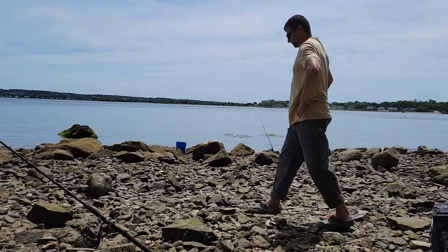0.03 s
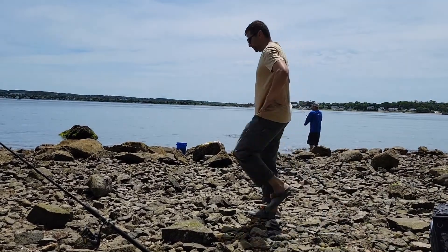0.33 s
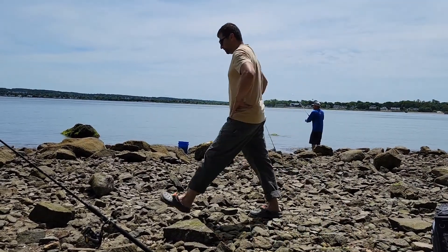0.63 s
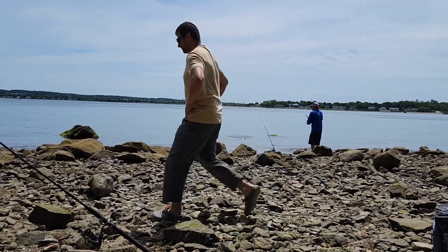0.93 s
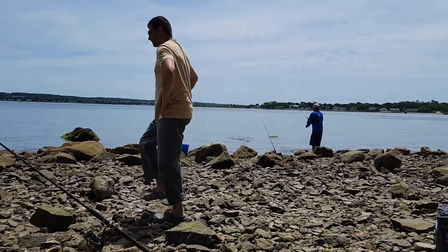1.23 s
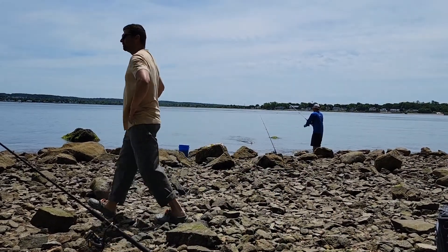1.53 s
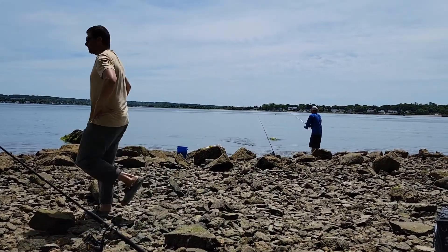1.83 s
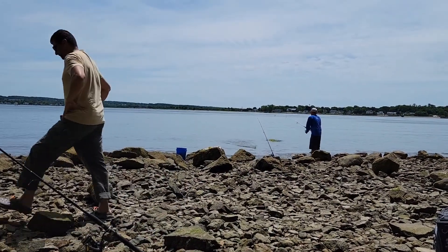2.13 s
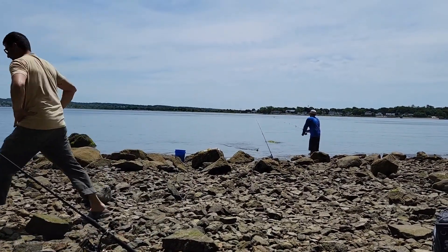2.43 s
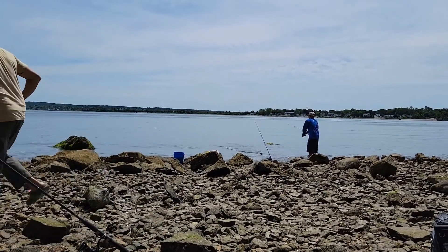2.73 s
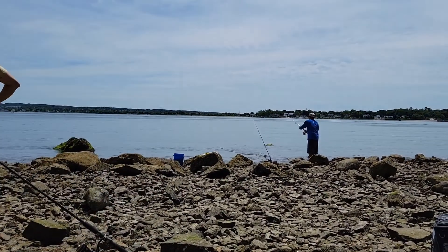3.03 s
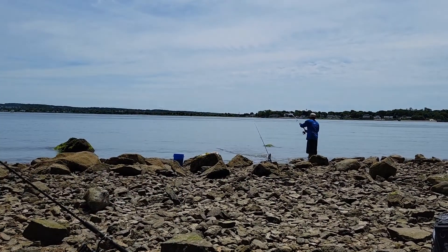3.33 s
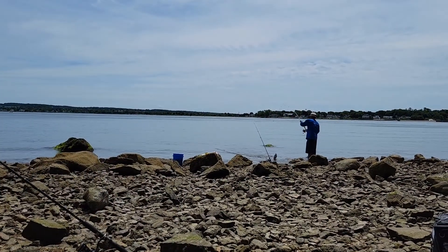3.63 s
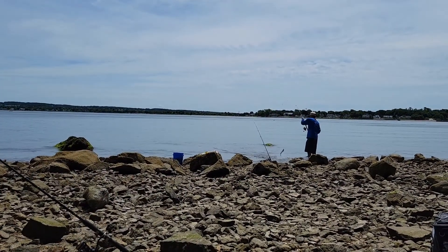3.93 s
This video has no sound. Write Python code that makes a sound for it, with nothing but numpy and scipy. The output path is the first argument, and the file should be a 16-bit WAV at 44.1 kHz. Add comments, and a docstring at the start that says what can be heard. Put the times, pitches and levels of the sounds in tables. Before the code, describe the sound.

Someone walks past on loose shore stones, over soft water and a distant low hum.

```python
"""A stony shore in stereo: someone walks past, close to the microphones, over loose flat stones.
From the start a light breeze brushes the microphones; behind lie a low rumble, a hum like a far boat
engine, a soft wash of water and a bird's thin high whistles. Each footfall rattles stones and crunches
grit; single stones rock and knock, loudest near 1 s, while chips tick and pebbles clink. After 2 s the
steps thin out and the breeze dies away. Just past 3 s the water swells, then a little air returns."""
import sys
import numpy as np
from scipy import signal
from scipy.fft import rfft, irfft, next_fast_len
from scipy.io import wavfile
from scipy.ndimage import uniform_filter1d, map_coordinates

SR = 44100
rng = np.random.default_rng(int(sys.argv[2]) if len(sys.argv) > 2 else 0)


def transcribe(signal):
    """Save signal, clipped to [-1, 1], as a 16-bit WAV file at the path in sys.argv[1]."""
    frames = np.atleast_2d(signal).T
    limited = np.clip(frames, -1, 1)
    pcm = np.round(limited * 32767).astype(np.int16)
    wavfile.write(sys.argv[1], SR, pcm)


N = 176400

# a foot loads or leaves the stones: (peak time [s], rise [s], fall [s], rattle [dB], grit [dB], sand [dB])
FOOT_PUSHES = [(.025, 0.059, 0.025, -59, -57.5, -64), (.085, 0.0084, 0.27, -59.5, -55, -70),
               (0.192, 0.06, 0.026, -48, -57.5, -59.5), (0.248, 0.014, 0.058, -53, -69, -57),
               (0.346, 0.051, 0.058, -56, -54, -54.5), (0.575, 0.041, 0.04, -57.5, -50.5, -59.5),
               (0.723, 0.011, 0.018, -56.5, -49.5, -57), (0.777, 0.006, 0.021, -46.5, -49, -61),
               (0.861, 0.052, 0.022, -49.5, -56, -57.5), (0.901, 0.017, 0.062, -54.5, -57.5, -60.5),
               (1.007, 0.029, 0.025, -50, -59, -63), (1.068, 0.014, 0.0091, -59.5, -53.5, -69),
               (1.284, 0.017, 0.064, -61, -57.5, -66), (1.385, 0.051, 0.023, -75, -66, -63.5),
               (1.666, 0.017, 0.01, -57, -60, -54.5), (1.713, 0.055, 0.043, -50, -58.5, -61.5),
               (1.862, .012, 0.015, -66, -61, -75), (2.456, 0.045, 0.1, -55.5, -58, -60),
               (2.986, 0.011, 0.022, -56.5, -57.5, -84), (3.37, 0.1, 0.3, -62, -61, -65.5),
               (3.5, 0.062, 0.041, -76, -60.5, -70), (3.934, 0.021, 0.02, -64, -55.5, -63)]
# stone strikes stone: (time [s], level [dB], pitch [Hz], swell [ms], left over right [dB])
STONE_KNOCKS = [(.171, -51, 1230, 2.2, -1), (.1895, -39, 1550, 0.8, -12), (0.1926, -29, 1070, 0.79, -7),
                (0.1975, -40, 1020, 1.7, -6), (0.2438, -38, 1420, .9, -6), (.5754, -29, 2240, 0.89, -3),
                (.5783, -38, 2150, 0.98, 13), (0.7716, -28, 3710, 0.35, -6),
                (0.7845, -34, 1020, 2.65, -9.5), (.8245, -41, 870, 0.82, 0), (.834, -38.5, 583, 1.03, 0),
                (0.8603, -36.5, 1280, 0.64, -3), (0.9863, -22.5, 740, 0.63, 0.5),
                (0.9893, -35.5, 900, 1.17, -7), (1.008, -39, 1570, 0.38, -9), (1.421, -48, 730, 0.8, 0),
                (1.678, -46, 1380, 1.2, 12), (1.683, -44.5, 605, 1.2, 4), (1.6935, -42, 563, 1, 0),
                (1.697, -40, 1610, .8, 7), (1.7048, -41.5, 946, 2.8, -6), (1.729, -47, 1510, .8, 10),
                (1.855, -42.5, 1200, 0.53, 2), (2.0467, -44.5, 745, 0.45, 4), (2.154, -49.5, 750, 1.2, 1),
                (2.363, -54.5, 950, 2.7, 0.5), (2.405, -50, 1300, 1.1, 1), (2.438, -50, 1190, 1.1, 4),
                (2.463, -49.5, 960, 1.6, 5), (2.5152, -44.5, 1370, 1.3, 2), (2.916, -44.5, 1830, .9, 0),
                (3.146, -44, 324, 4.6, -7), (3.493, -44, 1970, 0.74, -4), (3.895, -46, 2220, 1.7, 5),
                (3.936, -49, 1870, 2.4, 6)]
# the heel's weight meets the ground: (time [s], level [dB], pitch [Hz], swell [ms])
HEEL_THUDS = [(0.125, -43, 224, 7.1), (.575, -37, 55, 14), (3.324, -43.5, 218, 3.9)]
# small chips snap: (time [s], level [dB], t60 [s], left over right [dB])
CHIP_TICKS = [(0.0738, -52, 0.028, -1), (0.191, -54, 0.02, -8), (0.5744, -49, 0.0078, -2),
              (.7197, -53, 0.022, -1), (0.7707, -46, 0.015, 2), (1.059, -57, 0.014, -10),
              (1.2305, -49.5, 0.012, 3), (1.2503, -50, 0.0084, -3), (1.274, -52.5, 0.016, 1),
              (1.381, -53, 0.016, 0), (1.677, -49.5, 0.011, 2), (1.7302, -55, 0.013, 6),
              (2.3243, -51.5, 0.0079, -5), (3.1024, -54.5, 0.014, -4), (3.337, -49, 0.029, 3),
              (3.895, -52, 0.051, 0)]
# pebbles ring: (time [s], level [dB], pitch [Hz], t60 [s])
PEBBLE_CLINKS = [(0.192, -40, 4100, 0.024), (.861, -45, 6000, 0.023), (0.8938, -47, 4660, .06),
                 (1.0685, -49, 5450, 0.04), (1.276, -49, 3420, 0.043), (1.28, -60, 4580, 0.086),
                 (1.2896, -52.5, 3400, .09), (1.679, -41.5, 3880, 0.029), (1.855, -44.5, 4400, 0.024),
                 (2.281, -49, 6200, 0.023), (2.438, -52, 4150, .03), (2.458, -45, 4370, .03),
                 (2.525, -48, 4350, .03), (3.431, -43, 3430, 0.036), (3.4627, -50.5, 4380, 0.048)]
# resonances of the slabs and the gaps between them: (frequency [Hz], width [Hz], gain [dB])
HOLLOW_MODES = [(730, 54, 0), (999, 48, 1), (1290, 45, 3)]
# decay of sound scattered by the stones: (frequency [Hz], t60 [s])
GROUND_DECAY = [(200, 0.053), (1200, 0.016), (10000, 0.045)]
# the bird's calls: (time [s], length [s], pitch approached [Hz], level [dB])
BIRD_WHISTLES = [(-.05, .18, 7470, -59), (0.12, 0.22, 7670, -61), (0.435, 0.11, 8000, -67),
                 (1.07, 0.15, 8060, -69), (1.582, 0.27, 8100, -67), (2.09, 0.3, 7810, -60.5),
                 (3.172, 0.17, 8130, -65), (3.807, 0.19, 7920, -61.5)]
# tone colour of each source at the microphones: (frequency [Hz], relative level [dB])
SLAB_SPECTRUM = [(250, -1.5), (480, -0.5), (700, -5), (1000, -7.5), (1300, -7.5), (1700, 0), (3000, -7)]
SAND_SPECTRUM = [(800, -74), (3000, -20), (7200, -8), (9000, -19), (15500, -21.5)]
CHIP_SPECTRUM = [(800, -11), (2500, 7.5), (5000, 15), (7500, 11.5), (9500, 4), (15500, 3.5)]
BREEZE_SPECTRUM = [(10, -35), (25, -11.5), (45, 10), (80, -14), (160, -16.5), (400, -41.5)]
WASH_SPECTRUM = [(100, 3), (300, -6), (550, 2.5), (1000, 3.5), (1500, 1), (2050, -0.5), (2700, -9),
                 (4400, -11.5), (7300, -18), (9000, -26), (15500, -24)]
RUMBLE_SPECTRUM = [(12, -66), (25, -10.5), (45, -3), (100, -2.5), (140, -10.5), (240, -14.5), (330, -19),
                   (500, -33), (1200, -62)]
# air and water ebb and swell: (time [s], level [dB])
BREEZE_LEVEL = [(0, -50.5), (.6, -53), (1.1, -59.5), (2.2, -66), (3.2, -84), (4, -67)]
WASH_LEVEL = [(0, -55.5), (1.6, -55), (2.75, -55.5), (3.05, -55.5), (3.16, -52), (3.4, -55), (4, -54.5)]
# how alike the water is at the two microphones: (frequency [Hz], correlation [-1 to 1])
WASH_CORRELATION = [(250, 1), (600, -0.65), (1150, -0.87), (2000, -0.12)]

CRACK_DB, CRACK_T60_S = -32.5, 0.023  # level relative to its knock
RIGHT_LAG_MS = 0.15  # a knock's ring reaches the right microphone this much later
CLUMP_DB, TICK_ATTACK_S, SCATTER_DB = 2, 0.00097, -11
WHISTLE_RISE_HZ, WHISTLE_RISE_S, WHISTLE_WAVER_HZ, WHISTLE_RASP_HZ = 464, 0.1, 40, 175
HUM_HZ, HUM_DB, RUMBLE_DB = 72.34, -53, -50.5
BAND_LIMIT_HZ = 15850


def footsteps():
    """Close by, each push of a foot sets stones rattling, grit crunching and sand hissing."""
    t, power = np.arange(N) / SR, np.zeros((3, N))
    for s, rise, fall, *levels in FOOT_PUSHES:
        push = np.exp(np.minimum((t - s) / rise, (s - t) / fall))
        power += (amp(levels)[:, None] * push) ** 2
    rattle_gain, grit_gain, sand_gain = np.sqrt(power)
    stones = collisions(hz=1040, spread=0.47, cycles=5.7, size_db=1.5, count=5500, apart=0.91)
    rattle = unit(filtered(stones, lambda hz: amp(along(SLAB_SPECTRUM, hz))))
    clumps = unit(amp(CLUMP_DB * wobble(110)))
    grit = clumps * collisions(hz=3474, spread=.5, cycles=30, size_db=2.5, count=8500)
    sand = unit(amp(1.9 * wobble(500))) * rush(SAND_SPECTRUM, [(1000, 0.066)], patchy_db=4.0)
    return rattle_gain * rattle + grit_gain * grit + sand_gain * sand


def collisions(hz, spread, cycles, size_db, count, apart=1):
    """Tiny impacts ring briefly, their phase between the microphones scattered over `apart` cycles."""
    when, size, left_phase, offset = rng.random((count, 4)).T[:, :, None]
    right_phase = left_phase + apart * (offset - .5)
    pitch = hz * np.exp(spread * rng.standard_normal((count, 1)))
    pitch = np.where(pitch < 8200, pitch, hz)
    age = np.arange(SR // 80)
    turns = pitch * age / SR
    decay = amp(-size_db * np.log(.02 + size) - 60 * turns / cycles)
    envelope = decay * (1 - np.exp(-2 * turns)) * np.sqrt(pitch)
    samples = ((when * N).astype(int) + age).ravel()
    rings = (envelope * np.sin(2 * np.pi * (turns + phase)) for phase in (left_phase, right_phase))
    return unit(np.array([np.bincount(samples, side.ravel(), N)[:N] for side in rings]))


def knocks():
    """Rocking stones strike their neighbours with a crack and a short ring; the heel thuds beneath."""
    out, t = np.zeros((2, N)), np.arange(SR // 5) / SR
    arrival = t - np.array([[-RIGHT_LAG_MS], [RIGHT_LAG_MS]]) / 2000  # half the lag a side, in seconds
    for s, db, hz, swell_ms, pan_db in STONE_KNOCKS:
        dull_noise = signal.lfilter([1], [1, -.5], rng.standard_normal((2, len(t))))
        crack = amp(CRACK_DB - 60 * t / CRACK_T60_S) * dull_noise
        add(out, s, amp(db) * (ring(arrival, hz, swell_ms) + crack), pan_db)
    for s, db, hz, swell_ms in HEEL_THUDS:
        add(out, s, amp(db) * ring(t, hz, swell_ms), pan_db=-1)
    return out


def ring(t, hz, swell_ms):
    """A heavily damped ring that swells and dies within a few swell times."""
    swells = np.maximum(t, 0) * 1000 / swell_ms
    return (swells * np.exp(1 - swells)) ** 2 * -np.sin(2 * np.pi * hz * t)


def ticks():
    """Chips snap underfoot with a bright burst of noise."""
    out, t = np.zeros((2, N)), np.arange(SR // 10) / SR
    for s, db, t60, pan_db in CHIP_TICKS:
        envelope = amp(db - 60 * t / t60) * (1 - np.exp(-t / TICK_ATTACK_S))
        add(out, s, envelope * rng.standard_normal((2, len(t))), pan_db)
    return filtered(out, lambda hz: amp(along(CHIP_SPECTRUM, hz)))


def clinks():
    """Small hard pebbles ring briefly, each on one rough note."""
    out, t = np.zeros((2, N)), np.arange(SR // 8) / SR
    for s, db, hz, t60 in PEBBLE_CLINKS:
        roughness = np.cumsum(0.2 * rng.standard_normal((2, len(t))), axis=1)
        envelope = amp(db - 60 * t / t60) * (1 - np.exp(-t / TICK_ATTACK_S))
        add(out, s, envelope * np.sin(2 * np.pi * hz * t + roughness))
    return out


def hollow(x):
    """Every knock and rattle also rings the hollow under the slabs."""
    return x + filtered(x, lambda f: sum(amp(db) * 1j * f * width / (hz * hz - f * f + 1j * f * width)
                                         for hz, width, db in HOLLOW_MODES))


def ground_scatter(x):
    """The stony ground throws a very short diffuse tail back to the microphones."""
    hz, t, noise = signal.stft(rng.standard_normal((2, SR // 5)), SR, nperseg=128)
    decay = amp(-60 * t / along(GROUND_DECAY, hz)[:, None])
    tail = signal.istft(noise * decay, SR, nperseg=128)[1]
    return signal.fftconvolve(x, tail / np.linalg.norm(tail[0]), axes=1)[:, :N]


def breeze():
    """Light air buffets the microphones, mostly the right one."""
    level_db = np.interp(np.arange(N) / SR, *np.transpose(BREEZE_LEVEL)) + 2 * wobble(8.9)
    return amp(level_db) * rush(BREEZE_SPECTRUM, [(30, 0.26)], patchy_db=-1.0) * amp([[-3.5], [2]])


def bird():
    """Behind the steps, a bird's thin, raspy whistles slide up and level off."""
    t, out = np.arange(N) / SR, np.zeros((2, N))
    for s, length, hz, db in BIRD_WHISTLES:
        age = np.clip(t - s, 0, length)
        pitch = hz - WHISTLE_RISE_HZ * np.exp(-age / WHISTLE_RISE_S) + WHISTLE_WAVER_HZ * wobble(90)
        rasp = WHISTLE_RASP_HZ * np.array([wobble(1200), wobble(1100)])
        envelope = amp(db) * np.sqrt(np.abs(np.sin(np.pi * age / length)))
        out += envelope * np.sin(2 * np.pi * np.cumsum(pitch + rasp, axis=1) / SR)
    return out * amp(2.6 * wobble(60))


def water():
    """Water washes softly on the shore, wide across the microphones."""
    level_db = np.interp(np.arange(N) / SR, *np.transpose(WASH_LEVEL))
    return amp(level_db) * rush(WASH_SPECTRUM, WASH_CORRELATION, patchy_db=2.0)


def far_engine():
    """In the distance, a little to the right: low rumble and an engine's wavering hum."""
    correlation = [(25, 0.6), (60, 1.0), (140, 0.96), (320, 0.37)]
    rumble = amp(RUMBLE_DB) * rush(RUMBLE_SPECTRUM, correlation, patchy_db=1.5)
    hum_gain = amp(HUM_DB + 1.8 * wobble(5.59)) * np.sqrt(2)
    hum = hum_gain * np.sin(2 * np.pi * np.cumsum(HUM_HZ + 1.6 * wobble(8)) / SR)
    return (rumble + hum) * amp([[-1.2], [1.2]])


def rush(spectrum, correlation, patchy_db):
    """Stereo noise of rms 1 with patches of random gain in time and frequency."""
    noise = signal.stft(rng.standard_normal((2, N)), nperseg=512)[2]
    patches = uniform_filter1d(rng.standard_normal(noise.shape[1:]), size=7, axis=0)
    patches = uniform_filter1d(patches, size=8, axis=1)
    pair = signal.istft(noise * amp(patchy_db * unit(patches)), nperseg=512)[1][:, :N]
    angle = lambda hz: np.arccos(np.clip(along(correlation, hz), -1, 1)) / 2
    mid, side = filtered(pair, lambda f: amp(along(spectrum, f)) * [np.cos(angle(f)), np.sin(angle(f))])
    return unit(np.array([mid + side, mid - side]))


def amp(db):
    """Decibels to amplitude."""
    return 10 ** (np.asarray(db) / 20)


def unit(x):
    """Scale to rms 1."""
    return x / np.sqrt(np.mean(x ** 2) + 1e-20)


def along(points, hz):
    """Interpolate (frequency [Hz], value) points on a log axis."""
    frequencies, values = np.transpose(points)
    return np.interp(np.log(hz + 1), np.log(frequencies + 1), values)


def wobble(rate):
    """A smooth random curve, `rate` knots a second."""
    return map_coordinates(rng.standard_normal(N // 8), [np.arange(N) * rate / SR], mode="wrap")


def filtered(x, response):
    """Shape x by a frequency response."""
    size = next_fast_len(N + SR // 2)
    return irfft(rfft(x, size) * response(np.fft.rfftfreq(size, 1 / SR)), size)[..., :N]


def add(track, s, sound, pan_db=0):
    """Mix a sound into a stereo track at time s; positive pan is left."""
    start = max(0, round(s * SR))
    part = (sound * amp([[pan_db / 2], [-pan_db / 2]]))[:, :N - start]
    track[:, start:start + part.shape[1]] += part


def scene():
    """Steps and stones in front, bird, engine and water behind, breeze on the microphones."""
    hits = knocks() + ticks() + clinks()
    foreground = hollow(hits + footsteps()) + amp(SCATTER_DB) * ground_scatter(hits)
    return foreground + bird() + far_engine() + water() + breeze()


def record(dry):
    """The recorder keeps nothing above its band limit."""
    return filtered(dry, lambda hz: hz < BAND_LIMIT_HZ)


dry = scene()
out = record(dry)
transcribe(out)
```